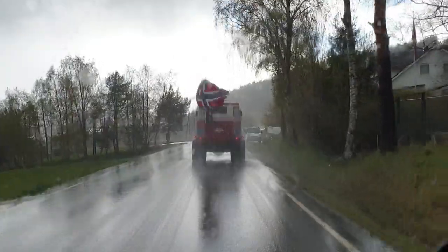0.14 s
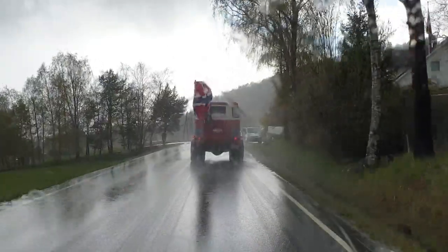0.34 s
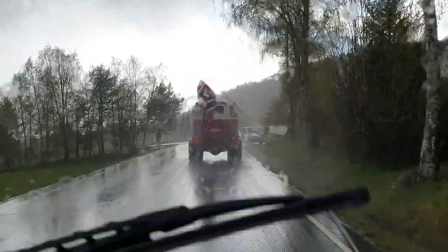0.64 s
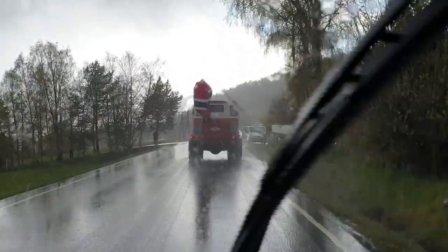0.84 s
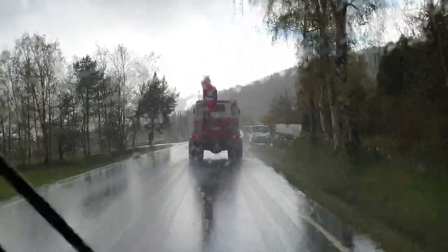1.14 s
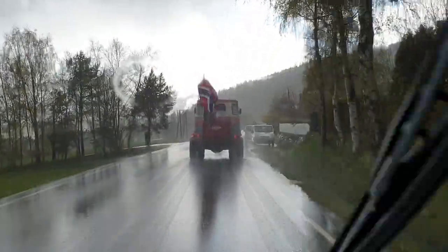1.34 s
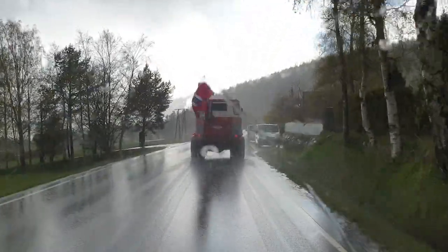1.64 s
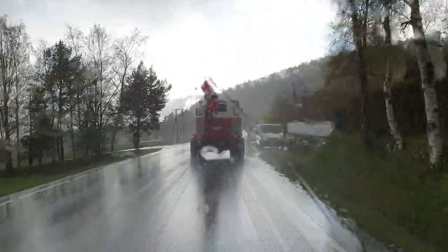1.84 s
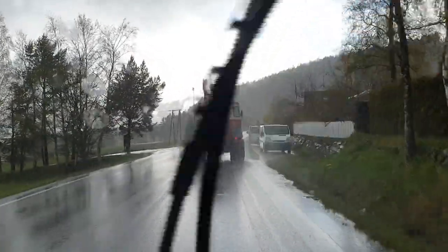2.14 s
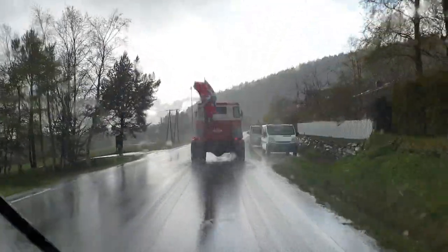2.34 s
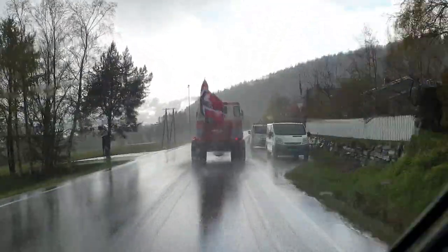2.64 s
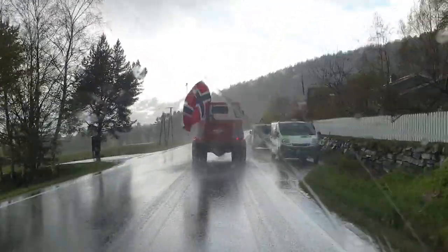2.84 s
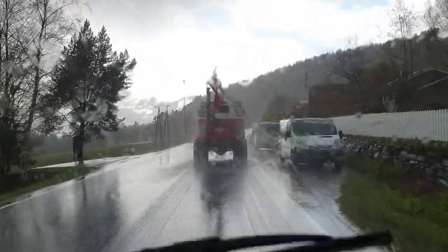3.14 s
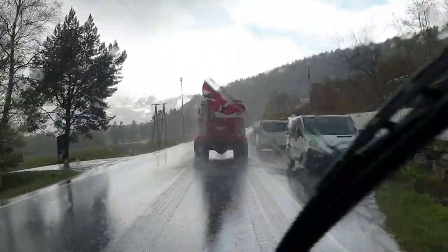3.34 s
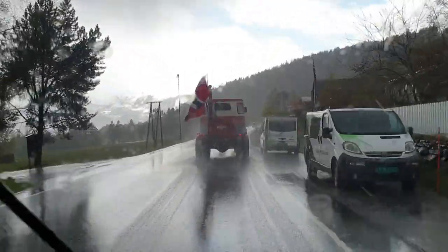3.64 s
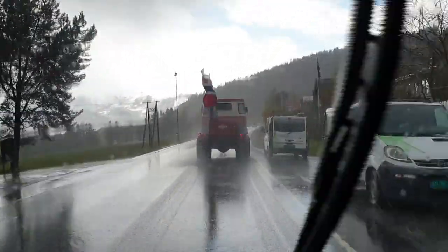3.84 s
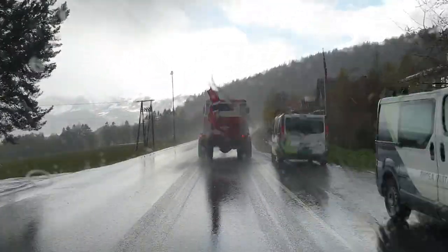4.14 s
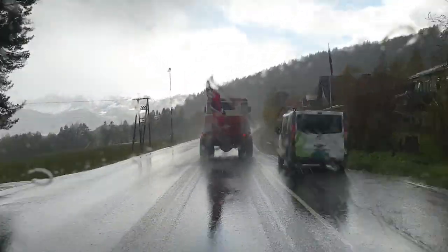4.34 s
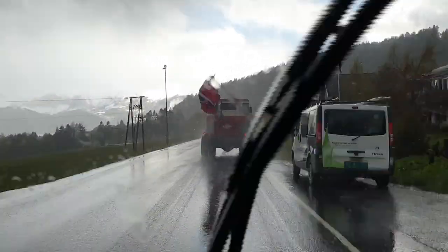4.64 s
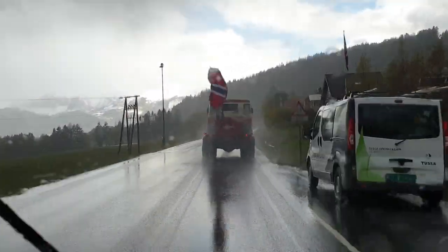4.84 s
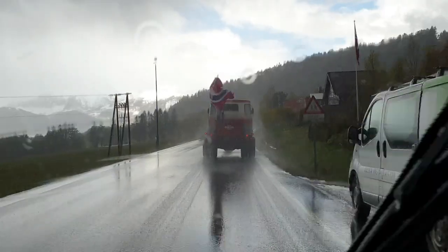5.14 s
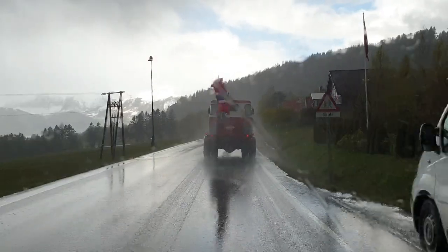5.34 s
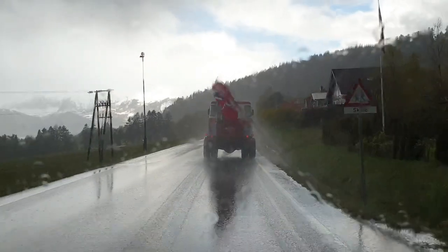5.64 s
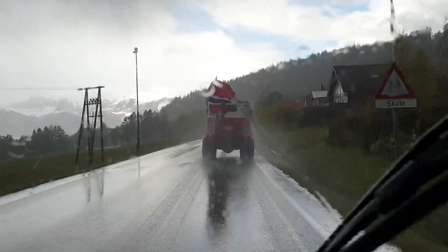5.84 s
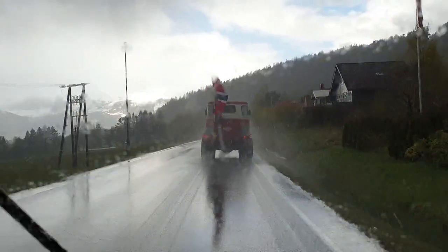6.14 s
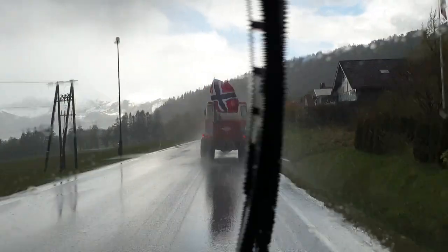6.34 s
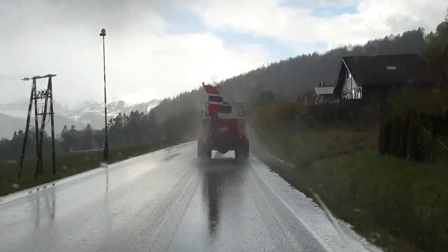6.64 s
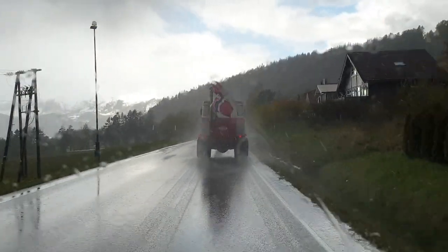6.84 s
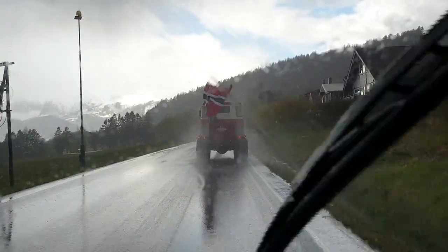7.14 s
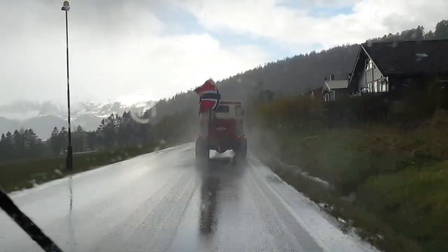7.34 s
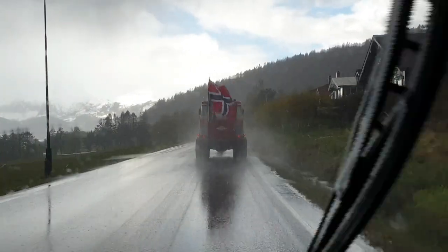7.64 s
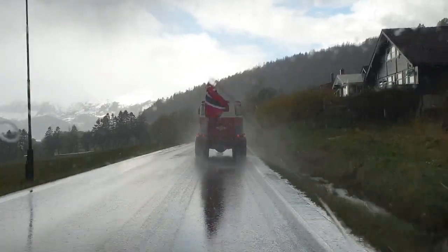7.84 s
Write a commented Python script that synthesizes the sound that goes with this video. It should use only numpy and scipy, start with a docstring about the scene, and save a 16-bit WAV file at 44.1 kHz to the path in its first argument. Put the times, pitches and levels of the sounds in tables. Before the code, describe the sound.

Heard from the front seat of a car driving slowly on a wet road. A deep, uneven boom and engine hum run throughout under dense, crisp raindrops ticking on the windscreen and a fine hiss of spray. About every 1.26 seconds the wipers flip with a soft thud, drag wetly out, judder with a short raspy squeak at the far end, then drag back. A few bumps and hollow roof drips are mixed in.

```python
"""Inside a car driving slowly through rain, heard in stereo from the front seat.
Drops splash and ring the glass over a hiss of spray; the road makes noise and sets the cabin air booming.
The engine is a harmonic hum with thin whines; big drips excite a hollow resonance in the roof panel.
The wipers cycle about every 1.26 s: a flip thumps in damped modes, wet rubber drags out and back as
filtered noise, and at the far end the blade judders in bursts of friction and squeaking modes."""
import sys
import numpy as np
from scipy import signal
from scipy.fft import rfft, irfft
from scipy.io import wavfile
from scipy.ndimage import uniform_filter1d

SR = 44100
rng = np.random.default_rng(int(sys.argv[2]) if len(sys.argv) > 2 else 0)


def unload_audio(sound):
    """Save the sound as a 16-bit wav file, at the path given as the first command line argument."""
    columns = np.transpose(np.atleast_2d(sound))
    # keep every value between -1 and 1, then stretch to whole-number steps
    steps = np.round(np.clip(columns, -1, 1) * 32767)
    wavfile.write(sys.argv[1], SR, steps.astype(np.int16))


N = 352800
TIME = np.arange(N) / SR

# Levels are those before the layer and mix gains; pitches are nominal where the sound wavers.
# Spectral outlines give relative level per Hz: colour() sets their overall power.

# Rolling noise, outline: hz, level_db
ROAD_OUTLINE = [(53, -25.5), (88, -2), (108, -9.5), (128, -4.5), (170, -15), (196, -6), (216, -6.5),
                (250, -16), (446, -14.5), (549, -21.5), (631, -20), (725, -25), (881, -23.5), (985, -27.5),
                (2500, -39.5), (3250, -36.5), (5500, -120)]
# Booming of the cabin air: time_s, level_db, pitch_hz
CABIN_BOOM = [(0, -25, 60.1), (.45, -19.5, 60.8), (.62, -20, 62), (.88, -19.5, 63), (1.05, -29.5, 64.2),
              (1.3, -23, 64.5), (1.6, -34, 65), (2.24, -19, 63), (2.37, -26, 63), (2.56, -32, 62),
              (2.69, -35, 62.76), (2.9, -15, 63.6), (3.07, -38, 64.34), (3.6, -28, 65.74),
              (4.0, -21.5, 63.87), (4.35, -22.5, 63.5), (5.55, -24, 66.2), (5.95, -19, 63.8),
              (6.3, -22, 63.73), (6.9, -20, 63.2), (7.3, -18.5, 62.66), (7.72, -24.5, 61.4), (8, -29, 61.4)]
# Shaking of the body on the uneven road: time_s, level_db
BODY_SHAKE = [(0.0, -43), (0.13, -35), (0.53, -30), (3.54, -31), (3.56, -38), (4.92, -39), (4.99, -48),
              (5.24, -26), (6.46, -46), (6.53, -43), (7.8, -61), (8.0, -36)]
# Width of the cabin sound: hz, side_minus_mid_db
CABIN_WIDTH = [(30, -30), (65, -20), (125, -11), (250, -12.5), (500, -5), (1000, 2), (2000, 1), (16000, -1)]
# Engine hum: time_s, firing_hz, level_db
ENGINE_HUM = [(0, 60.94, -29.5), (.6, 61.87, -36), (1.3, 64, -27), (2.1, 64.54, -45.5), (3.3, 73.25, -31.5),
              (3.8, 73, -31.5), (5.3, 73.22, -27.5), (6.8, 75.03, -31.5), (7.5, 62.8, -42), (8, 60.6, -40)]
# Engine harmonics: multiple (of firing_hz), level_db
ENGINE_ORDERS = [(1, 1.5), (2, -17.5), (3, -22.5)]
# Faint whines of the drive: pitch_hz, level_db
DRIVE_WHINES = [(837, -69), (1379, -78), (1623, -79), (1777, -83)]
# How hard the rain comes down: time_s, wash_db
RAIN_WASH = [(0, -44), (.18, -48), (.32, -46), (1.1, -43.5), (2.15, -44.5), (2.48, -42), (3.1, -46),
             (3.7, -47), (4.0, -50), (4.5, -48.5), (4.76, -44), (5.2, -50), (5.87, -44.5), (6.35, -47.5),
             (6.85, -45.5), (7.28, -47), (7.55, -45.5), (8, -48.5)]
# Heavy drops: start_s, level_db, tick_db (re level), pan_db (left minus right), ring_hz, ring_db (re level)
HEAVY_DROPS = [(.2305, -30, -21, 1, 2900, -2.5), (.2755, -30, -10, 5, 2690, -6),
               (.2972, -29, -9, 0, 3120, -4), (.318, -30, -9, 0, 1890, -3),
               (.3303, -28.5, -16, 1, 2300, -4), (.4419, -33, -8, 1, 3600, -6),
               (.5133, -28, -3, 4, 2420, -1), (.6744, -28.5, -22, 4, 4040, 2),
               (.7055, -28.5, -20, 1, 3050, -7), (.764, -35, -19, 2, 2300, 3),
               (.8612, -27.5, -14, -1, 3070, -7), (.9315, -29.5, -11, 3, 1803, -3),
               (1.033, -33, -7, -2, 2624, -8), (1.0401, -27, -8, 3, 2560, -4),
               (1.1865, -34, -6, -1, 1640, -13), (1.2131, -32, -12, 2, 3500, -4),
               (1.283, -28.5, -12, 7, 1750, -9), (1.3344, -32.5, -9, 2, 3300, -4),
               (1.4085, -36, -9, 4, 4690, 3), (1.6182, -27.5, -11, 2, 3400, -11),
               (1.727, -25, -4, 3, 1945, -4), (2.2643, -32.5, -10, -1, 3040, -5),
               (2.3057, -40, -14, 0, 3800, -2), (2.323, -26, -7, 10, 2100, -14),
               (2.7031, -31.5, -5, 2, 1680, -8), (2.8404, -33, -6, 1, 3004, -2),
               (2.8734, -33.5, -10, 4, 3700, -8), (3.1175, -36, -8, 2, 3400, -4),
               (3.1772, -34, -5, 2, 3260, -4), (3.2626, -35, -16, 1, 4380, 5),
               (3.457, -26.5, -11, 3, 3140, -6), (3.8092, -35, -6, 1.5, 2000, -3),
               (3.874, -33.5, -10, -2, 2710, -7), (4.219, -33, -10, 4, 2560, -14),
               (4.339, -36, -9, 2, 2500, -2), (4.5386, -36, -10, 2, 3374, -1),
               (4.5918, -33, -14, 4, 1894, -6), (5.0773, -37, -2, 4, 1808, -6),
               (5.6664, -26, -18, 0, 4333, 2), (5.7735, -34, -14, 2, 3300, -3),
               (5.8376, -26.5, -11, -1, 4440, 3), (5.9384, -34, -14, 4, 3600, -4.5),
               (6.1823, -31, -11, 3, 2855, -2), (6.7131, -32, -4.5, 9, 4540, 1),
               (6.8024, -32, -6, 3, 4360, 3), (6.9275, -35, -6, 0, 1573, -10),
               (7.1755, -23.5, -15, -1, 4300, -3)]
# Modes of the spot a drop hits: multiple (of ring_hz), level_db
SPOT_MODES = [(.7, -15), (1, -4), (1.16, -8), (1.36, -14.5), (2.2, -12)]
# Glass under the drops, outline: hz, level_db
GLASS_OUTLINE = [(200, -0.5), (600, -5), (1200, -2.5), (2000, 0.5), (3000, 0.5), (4500, -1), (6500, -5),
                 (8500, -17.5), (16000, -33)]
# Bright splashes and mist, outline: hz, level_db
SPLASH_OUTLINE = [(1000, -82), (5000, 4.5), (7000, 6.5), (8800, -2), (11000, 4.5), (14000, 0.5),
                  (16000, -3.5)]
# Fine spray on the body, outline: hz, level_db
SPRAY_OUTLINE = [(500, -3), (1500, 2.5), (2700, 1.5), (4500, 0.5), (6500, -10), (8800, -23), (15000, -19)]
# Wiper cycles: flip_s, thump_db, out_drag_db, out_boom_db, back_drag_db, back_boom_db
WIPER_CYCLES = [(0.5501, -19, -29, -32, -30, -17), (1.807, -17, -28.5, -14.5, -30.5, -23),
                (3.0693, -16, -28, -13.5, -30, -21.5), (4.3304, -17.5, -29, -16.5, -33, -31),
                (5.596, -19.5, -29.5, -35, -29, -28), (6.859, -17, -27.5, -24, -29.5, -30)]
# Bumps that jolt the body: start_s, level_db, rattle_db (re level)
BODY_BUMPS = [(3.72, -26.5, -22), (3.779, -28, -20), (4.41, -26.5, -22), (5.672, -23.5, -10),
              (6.23, -25, -8.5), (7.024, -26, -10), (7.176, -22, -17)]
# Windscreen and wiper arm modes: pitch_hz, t60_s, level_db
ARM_MODES = [(121.3, 0.1, 2.5), (224, 0.044, -34), (288, 0.049, -4), (321, 0.096, -4.5), (436, 0.039, -20),
             (598, 0.036, -8.5)]
# Rattling linkage, outline: hz, level_db
LINKAGE_OUTLINE = [(200, 2), (450, 2.5), (1100, -9), (1800, -21), (6000, -44)]
# Windscreen growling, outline: hz, level_db
GROWL_OUTLINE = [(100, -24.5), (190, -2.5), (220, 13), (248, 4.5), (290, 5.5), (350, -0.5), (470, -1),
                 (700, -12.5), (2000, -43.5)]
# Wet rubber dragged over glass, outline: hz, level_db
DRAG_OUTLINE = [(50, -29.0), (90, 4.5), (130, 12.5), (170, 2.5), (220, -2.5), (320, -2),
                (500, -18.0), (900, -17.0), (4000, -50.0)]
# Big drips on the roof: start_s, level_db, ring_hz
ROOF_DRIPS = [(.91, -33.5, 620), (3.259, -29, 953), (4.591, -32.5, 850), (7.167, -27.5, 700)]
# Tap of a drip on the roof, outline: hz, level_db
TAP_OUTLINE = [(300, -11), (650, 3.0), (950, 0.0), (1300, -2), (1700, -18), (3000, -8), (8000, -28)]
# Judders of the blade: start_s, length_s, rasp_db, growl_db, growl_hz, squeak_db (re rasp)
BLADE_JUDDERS = [(1.097, 0.022, -25.5, -30, 223, -6), (1.141, 0.016, -26.5, -28, 331, -12),
                 (1.168, .016, -51, -27, 200, -10), (2.33, 0.026, -26.5, -29.5, 306, -7),
                 (2.369, 0.027, -36.5, -39, 270, -6), (2.395, .026, -36, -27, 263, -5),
                 (2.433, .016, -38, -27.5, 250, -10), (3.093, 0.01, -32.5, -41, 318, -9),
                 (3.593, 0.015, -27.5, -27, 344, -7), (3.616, 0.024, -36.5, -33.5, 607, -3),
                 (3.645, .052, -31, -31, 328, -5.5), (4.863, 0.008, -24.5, -24, 252, -5.5),
                 (4.875, 0.0068, -24, -25, 250, -7), (4.893, .018, -28, -23.5, 246, -3),
                 (4.9135, 0.0066, -22.5, -22, 237, -3.5), (4.933, 0.0081, -27, -21, 255, -6),
                 (4.955, 0.014, -39, -28, 235, -12), (6.119, 0.028, -29.5, -27, 267, -8),
                 (6.166, .026, -24.5, -19.5, 233.4, -9), (6.203, .019, -33, -27, 256, -5),
                 (7.394, 0.024, -25.5, -22, 224, -7), (7.434, .019, -26, -20.5, 240, -8),
                 (7.462, .018, -30, -28, 250, -8)]
# Rasp of the rubber, outline: hz, level_db
RUBBER_OUTLINE = [(200, -31.5), (450, 12), (700, 3), (1200, 4), (2300, 0), (3100, -4), (4700, -9.5),
                  (7000, -24.5), (12000, -41)]
# Squeak modes of the blade: pitch_hz, level_db, release_s, stray (rms share of pitch)
BLADE_MODES = [(842, 4, 0.022, 0.0055), (1148, 2, 0.012, .025), (1400, -5, .01, .02),
               (1600, 0, 0.015, 0.013), (1798, -1, 0.014, 0.011), (2124, -2, 0.008, 0.036),
               (2296, -3, 0.015, 0.011), (2930, -1.5, .008, 0.0195), (3350, -7, .006, 0.031),
               (3900, -9, .006, .02)]

WHINE_WAVER = 0.0136  # rms share of their pitch
HUM_WAVER_DB = 2  # rms
FLURRY_DB, FLURRIES_PER_S = 0.1, 20  # the rain comes in small flurries
MIST_DB, USUAL_WASH_DB = -57.5, -46.5  # fine mist in usual rain
MIST_GROWTH = .75  # dB more mist per dB of wash
TURN_S, OUT_S, BACK_S = 0.552, 0.38, 0.27  # from flip to far end; how long the blades drag each way
SWELL_LAG_S, SWELL_S = 0.22, 0.076  # boom peaks this long after each reversal; gaussian spread
FLIP_RATTLE_DB = -23  # re thump
SCREEN_DB = -3.5  # main ring of the windscreen, re growl
TOP_HZ = 15600


def undb(db):
    """Decibels to gain."""
    return 10 ** (np.asarray(db) / 20)


def unit(x):
    """Scale to rms 1."""
    return x / np.sqrt(np.mean(x ** 2))


def curves(table):
    """Each column of a timed table at every sample."""
    s, *columns = np.transpose(table)
    return [np.interp(TIME, s, column) for column in columns]


def add(bus, s, sound):
    """Mix a sound into a bus at time s."""
    i = max(int(s * SR), 0)
    bus[..., i:i + sound.shape[-1]] += sound[..., :max(N - i, 0)]


def pan(db):
    """Left and right gains for a left-minus-right level."""
    return undb(np.array([[db], [-db]]) / 2)


def noise():
    """Unrelated white noise for each ear."""
    return rng.standard_normal((2, N))


def walk(rate):
    """Smooth random drift of rms 1, from about `rate` fresh values a second."""
    k = int(SR / rate)
    steps = np.repeat(rng.standard_normal(N // k + 1), k)
    return unit(uniform_filter1d(uniform_filter1d(steps, k), k)[:N])


def gains(points, hz):
    """A (hz, level_db) outline as gains at the given frequencies."""
    f, db = np.transpose(points)
    return undb(np.interp(np.log(hz + 1), np.log(f), db))


def colour(x, points, size=4096):
    """Causal minimum-phase filter with the given outline and unit power gain."""
    cepstrum = irfft(np.log(gains(points, np.arange(size // 2 + 1) * SR / size)))
    # folding the cepstrum forward in time makes the filter causal
    cepstrum[1:size // 2] *= 2
    cepstrum[size // 2 + 1:] = 0
    response = irfft(np.exp(rfft(cepstrum)))
    response = response / np.linalg.norm(response)
    return signal.oaconvolve(x, response[None], axes=1)[:, :N]


def resonate(x, hz, width):
    """One resonance, gain 1 at its centre."""
    return signal.lfilter(*signal.iirpeak(hz, hz / width, fs=SR), x)


def cabin(x):
    """A diffuse field: long waves reach both ears alike, short ones do not."""
    mid, side = rfft(x)
    share = gains(CABIN_WIDTH, np.arange(len(mid)) * SR / N)
    ears = np.array([mid + share * side, mid - share * side])
    return irfft(ears / np.sqrt(1 + share ** 2), N)


def rumble(hz, width):
    """A low resonance shaken at random."""
    once = resonate(noise(), hz, width)
    return unit(resonate(once, hz, 1.4 * width))


def road(drone_db=-3.5, loose_db=-10.0, throb_db=2.5):
    """The tyres shake the body, set the cabin air booming and roar unevenly."""
    boom_db, hz = curves(CABIN_BOOM)
    strength = np.hypot(undb(boom_db), swells())
    phase = 2 * np.pi * np.cumsum(hz + 1.39 * walk(20)) / SR
    drone = np.sqrt(2) * np.sin(phase) * undb(drone_db + throb_db * walk(24))
    boom = strength * undb(loose_db) * rumble(62.0, 43.0)
    shake = undb(curves(BODY_SHAKE)[0]) * rumble(48.4, 37)
    roar = unit(colour(noise(), ROAD_OUTLINE)) * undb(-30.5 + 1.0 * walk(9))
    return strength * drone + cabin(boom + shake + roar)


def engine():
    """Firing hum with a few harmonics, and thin wavering whines of the drive."""
    hz, db = curves(ENGINE_HUM)
    phase = 2 * np.pi * np.cumsum(hz) / SR
    hum = sum(undb(db + order_db) * np.sin(multiple * phase) for multiple, order_db in ENGINE_ORDERS)
    whine = np.zeros(N)
    for pitch_hz, line_db in DRIVE_WHINES:
        line_phase = 2 * np.pi * np.cumsum(pitch_hz * (1 + WHINE_WAVER * walk(40))) / SR
        whine += undb(line_db + 2 * walk(4.4)) * np.sin(line_phase)
    return np.sqrt(2) * (hum * undb(HUM_WAVER_DB * walk(12) + 0.5) + whine)


def patter(wash_db, per_second, top_db, range_db, tick_db, scatter_db=4, ring_db=-3):
    """Drops at random, many small and few large, as rows like those of HEAVY_DROPS."""
    count = int(per_second * N / SR)
    when, size, bright, side, spot = rng.random((count, 5)).T
    s = when * N / SR
    # exponential spread of levels, capped at top_db over the wash
    spread_db = np.minimum(-scatter_db * np.log(1 - size) - range_db, 0)
    db = np.interp(s, TIME, wash_db) + top_db + spread_db
    ticks_db = tick_db + 20 * (bright - .5)
    pan_db = 3 + 10 * (side - .5)
    rings_db = ring_db - 8 * (bright - .5)
    return np.column_stack([s, db, ticks_db, pan_db, 1500 + 3500 * spot, rings_db])


def ping(hz, t60=0.016, stray=0.074, contact_s=0.00041, ear_spread=1.0):
    """The struck spot of glass rings briefly in a few modes, never twice the same."""
    t = TIME[:1400]
    ratio, db = np.transpose(SPOT_MODES)
    modes_hz = hz * ratio * (1 + stray * (ratio - 1) * rng.standard_normal(len(SPOT_MODES)))
    # each mode starts at its own phase in each ear
    strength = undb(db) * np.exp(1j * ear_spread * rng.standard_normal((2, len(SPOT_MODES))))
    ring = (strength @ np.exp(2j * np.pi * np.outer(modes_hz, t))).imag
    return ring * undb(-60 * t / t60) * (1 - np.exp(-t / contact_s))


def rain(ring_t60=0.072, tick_t60=0.024, crack=4.14, scatter_db=-5.5, echo_s=0.0048, echo_db=-10):
    """Each drop splashes and rings its own spot of glass; the finest ones merge into a hiss."""
    wash_db = curves(RAIN_WASH)[0] + FLURRY_DB * walk(FLURRIES_PER_S)
    mist_db = MIST_DB + MIST_GROWTH * (wash_db - USUAL_WASH_DB)
    small = patter(wash_db, per_second=130, top_db=7.5, range_db=7.5, tick_db=-13.5)
    medium = patter(wash_db, per_second=7, top_db=11.5, range_db=8.5, tick_db=-13.5)
    t = TIME[:4400]
    # a quick ring, then the faint tail of the cabin
    tail = .1 * undb(-60 * t / .2)
    ring = undb(-60 * t / ring_t60) + tail
    tick = undb(-60 * t / tick_t60) + tail
    glass, splash = np.zeros((2, 2, N))
    for s, db, bright_db, pan_db, hz, ring_db in np.vstack([HEAVY_DROPS, medium, small]):
        grain = rng.standard_normal((2, len(t)))
        grain[:, 0] = crack  # the impact arrives before its scatter
        spot = ping(hz) * undb(db + ring_db) * pan(pan_db)
        add(glass, s, grain * ring * undb(db + scatter_db) * pan(pan_db))
        add(glass, s, spot)
        # off the dashboard, ears swapped
        add(glass, s + echo_s * (.5 + rng.random()), undb(echo_db) * spot[::-1])
        add(splash, s, grain * tick * undb(db + bright_db))
    spray = colour(noise(), SPRAY_OUTLINE) * undb(wash_db + 0.83 + 0.87 * walk(25))
    splash += noise() * undb(mist_db + 1.0 + 1.6 * walk(13))
    # the glass sounds more to the left, the bright splashes more to the right
    return (colour(glass, GLASS_OUTLINE) + spray) * pan(2.2) + colour(splash, SPLASH_OUTLINE) * pan(-2.5)


def thud(detune=0.021, contact_s=0.0043):
    """Screen and wiper arm ring under soft rubber contact, a little differently at each blow."""
    t = TIME[:SR // 4]
    tuning = 1 + detune * rng.standard_normal(len(ARM_MODES))
    modes = sum(undb(db - 60 * t / t60) * np.sin(2 * np.pi * hz * k * t)
                for (hz, t60, db), k in zip(ARM_MODES, tuning))
    return -modes * (1 - np.exp(-t / contact_s))


def knocks(rattle_t60=0.069, tail_db=-16, tail_t60=0.22):
    """A blade flips over or the body takes a bump: the screen thuds and shudders, the linkage rattles."""
    out, t = np.zeros((2, N)), TIME[:SR // 4]
    rattle, tail = np.zeros((2, N))
    flips = [(s, db, FLIP_RATTLE_DB) for s, db, *_ in WIPER_CYCLES]
    for s, db, rattle_db in np.vstack([flips, BODY_BUMPS]):
        add(out, s, undb(db + 6.0) * thud()[None])
        add(rattle, s, undb(db + rattle_db - 60 * t / rattle_t60))
        add(tail, s, undb(db + tail_db - 60 * t / tail_t60))
    linkage = colour(noise() * rattle, LINKAGE_OUTLINE)
    shudder = colour(noise() * tail, GROWL_OUTLINE)
    return out + cabin(2 * linkage + shudder)


def strokes():
    """Wet rubber drones softly as it is dragged over the glass, out and back."""
    drag = np.zeros(N)
    for s, _, out_db, _, back_db, _ in WIPER_CYCLES:
        for start, length, db in (s, OUT_S, out_db), (s + TURN_S, BACK_S, back_db):
            add(drag, start, undb(db) * np.sqrt(np.hanning(int(length * SR))))
    return drag * unit(colour(noise(), DRAG_OUTLINE))


def swells():
    """Each stroke of the wipers pushes on the screen and makes the cabin boom swell."""
    def swell(s, db):
        return undb(db) * np.exp(-.5 * ((TIME - s - SWELL_LAG_S) / SWELL_S) ** 2)

    return sum(swell(s, out_db) + swell(s + TURN_S, back_db)
               for s, _, _, out_db, _, back_db in WIPER_CYCLES)


def drips(ring_t60=0.12, ring_width_hz=260, ring_db=-3, tap_db=2):
    """A big drip lands on the padded roof panel with a soft, hollow tap."""
    taps, rings = np.zeros((2, 2, N))
    t = TIME[:SR // 4]
    for s, db, hz in ROOF_DRIPS:
        blow = undb(db - 60 * t / ring_t60) * (1 - np.exp(-t / 0.0013))
        hollow = unit(resonate(rng.standard_normal((2, len(t))), hz, ring_width_hz))
        add(taps, s, blow * undb(tap_db))
        add(rings, s, blow * undb(tap_db + ring_db) * hollow)
    return rings + taps * colour(noise(), TAP_OUTLINE)


def judders(slip_hz=170, attack_s=0.0016, release_s=0.012, glide=0.011, growl_release_s=0.021,
            uneven_db=3, rasp_db=-2, growl_noise_db=-4):
    """The blade sticks and slips as it turns: a rasp, a growl of the screen and short rising squeaks."""
    rasp, growl, squeak, screen = np.zeros((4, 2, N))
    t = TIME[:SR // 4]

    def envelope(length, release):
        return (1 - np.exp(-t / attack_s)) * np.exp(-np.maximum(t - length, 0) / release)

    def ring(hz, bend, c, stray):
        return np.sin(2 * np.pi * (hz * (1 + stray * c[0]) * bend + c[2:]))

    for s, length, db, growl_db, growl_hz, squeak_db in BLADE_JUDDERS:
        shudder = undb(growl_db) * envelope(length, growl_release_s)
        add(rasp, s, undb(db) * envelope(length, release_s))
        add(growl, s, shudder)
        # the lip tightens as it bends, so its modes rise; each judder favours other modes
        bend = np.cumsum(1 + glide * np.tanh(2 * t / length - 1)) / SR
        # random columns: pitch, level, phase in the left ear, phase in the right
        chance = rng.standard_normal((len(BLADE_MODES) + 1, 4, 1))
        modes = np.zeros((2, len(t)))
        for (hz, mode_db, release, stray), c in zip(BLADE_MODES, chance):
            mode_gain = undb(mode_db + uneven_db * c[1])
            modes += mode_gain * ring(hz, bend, c, stray) * envelope(length, release)
        add(squeak, s, undb(db + squeak_db - 6) * modes)
        add(screen, s, shudder * undb(SCREEN_DB) * unit(ring(growl_hz, bend, chance[-1], 0.031)))
    # every slip is a burst of friction that fades until the next
    cycle = np.cumsum(slip_hz * (1 + 0.25 * walk(200))) / SR % 1
    slips = unit(np.exp(-cycle / .5) * undb(walk(150)))
    rasping = rasp * undb(rasp_db) * colour(noise() * slips, RUBBER_OUTLINE)
    growling = growl * undb(growl_noise_db) * colour(noise() * slips, GROWL_OUTLINE)
    # the squeak pulses only faintly with the slips
    return slips ** 0.089 * squeak + screen + rasping + growling


def scene():
    """Everything as heard from the front seat, the body sounds a little to the left."""
    body = road() + engine() + knocks() + cabin(strokes() + drips() + judders())
    return body * pan(1.7) + rain()


def record(dry):
    """The recorder cuts the very top with a steep low-pass filter."""
    return signal.sosfilt(signal.ellip(8, .2, 70, TOP_HZ, fs=SR, output="sos"), dry)


dry = scene()
out = record(dry)
unload_audio(out)
```